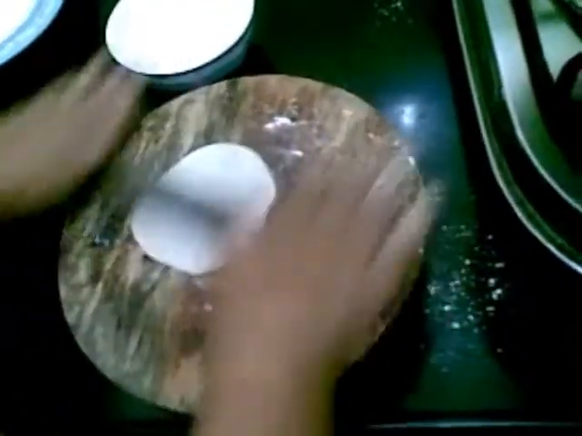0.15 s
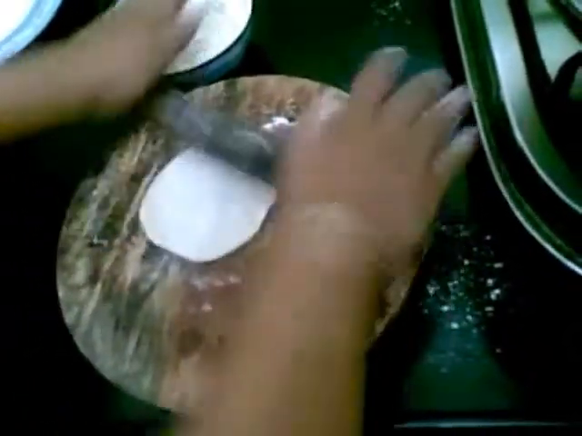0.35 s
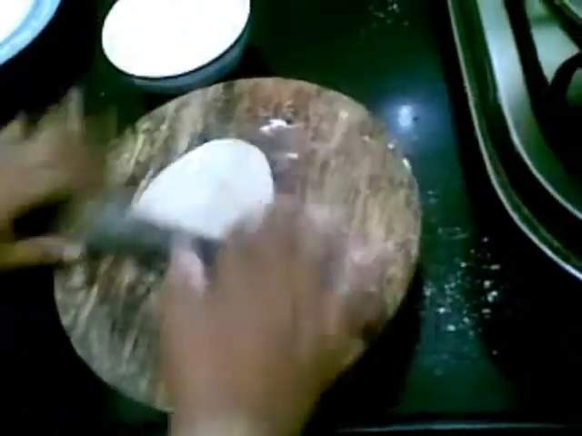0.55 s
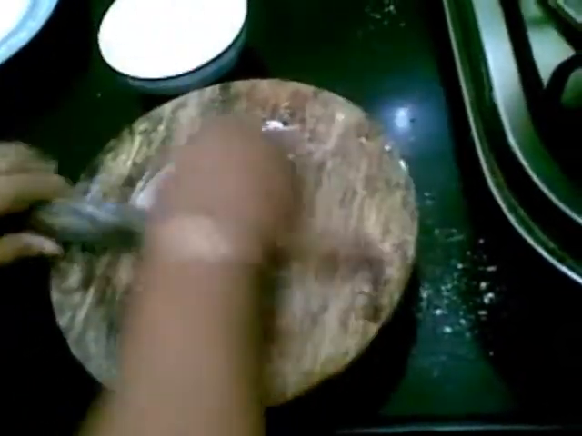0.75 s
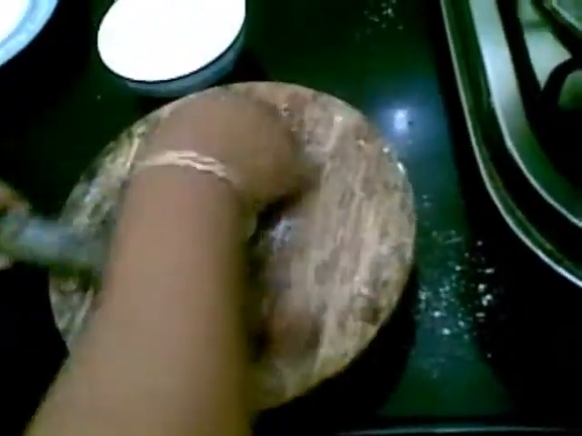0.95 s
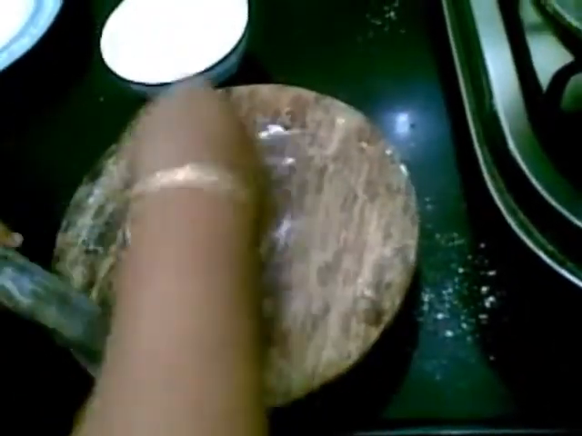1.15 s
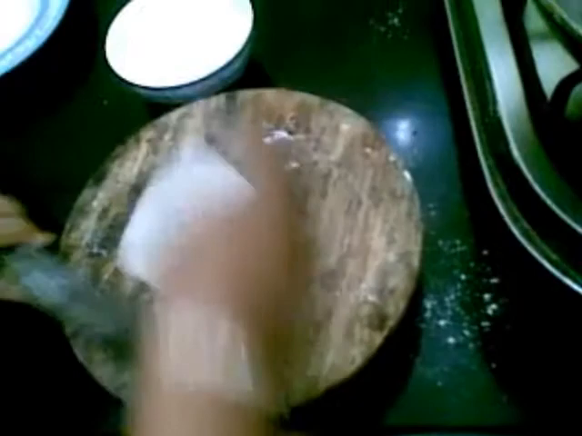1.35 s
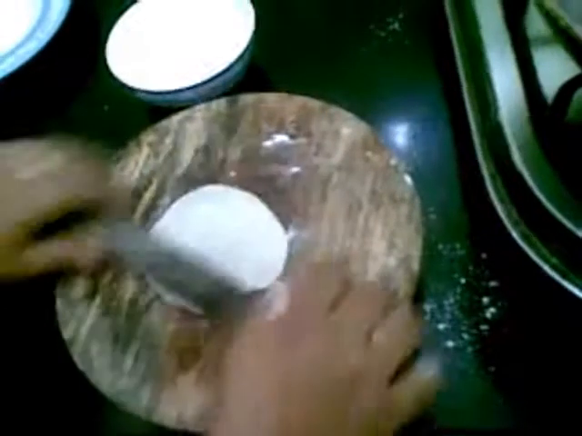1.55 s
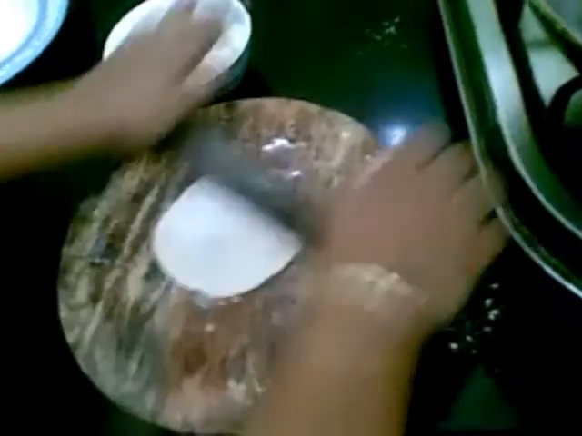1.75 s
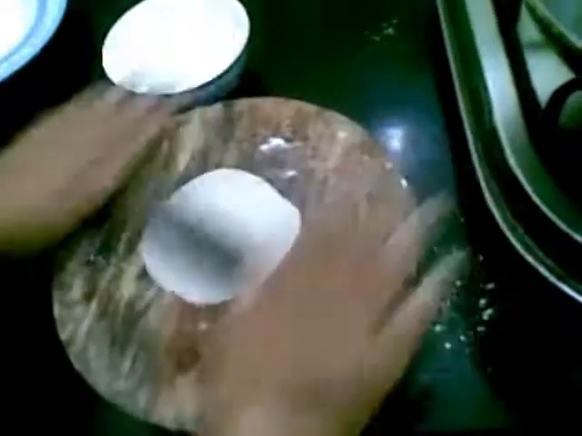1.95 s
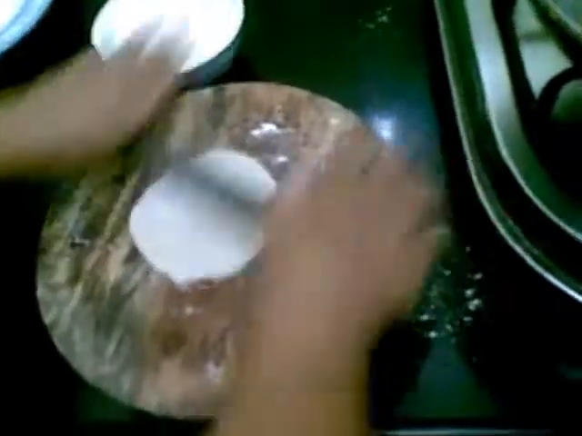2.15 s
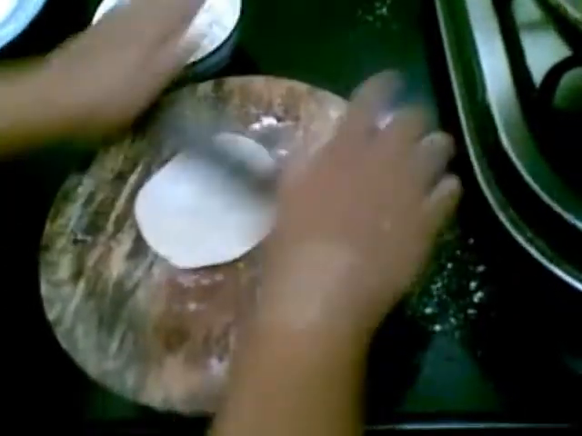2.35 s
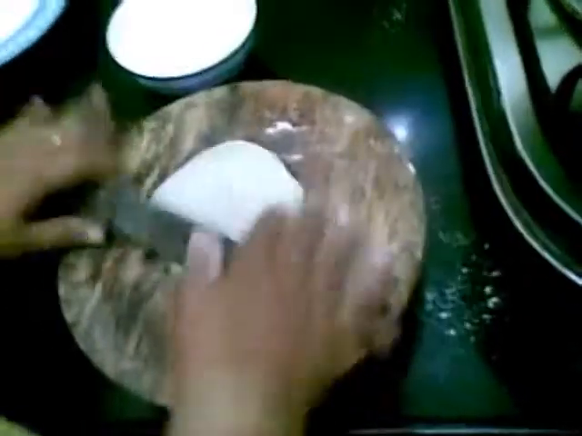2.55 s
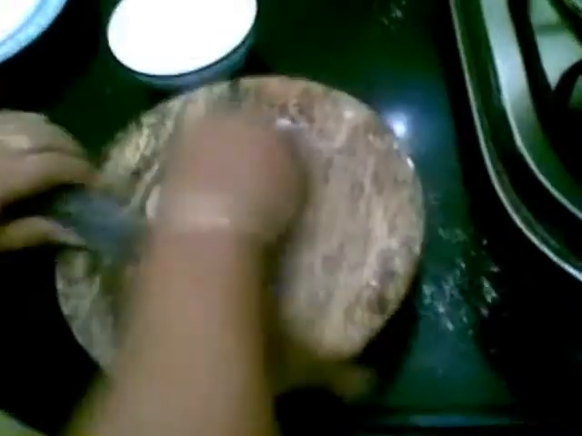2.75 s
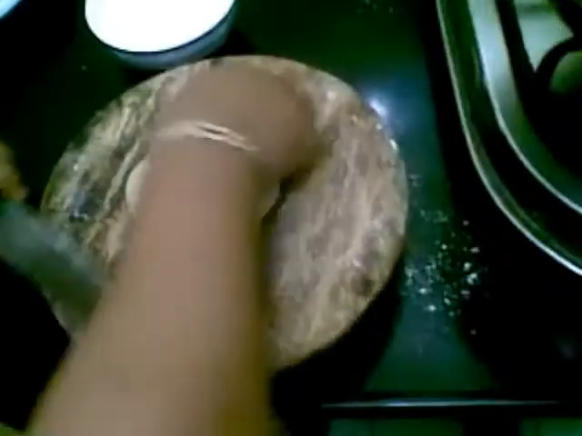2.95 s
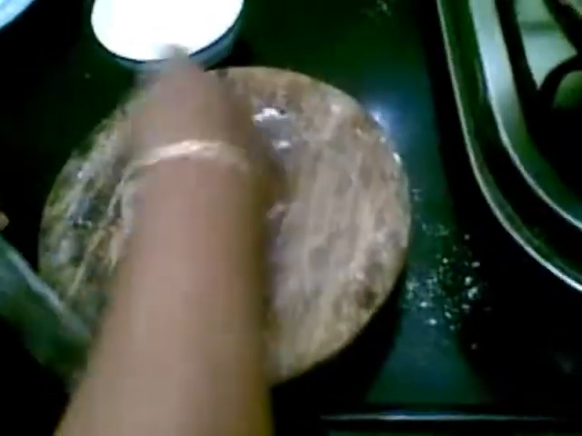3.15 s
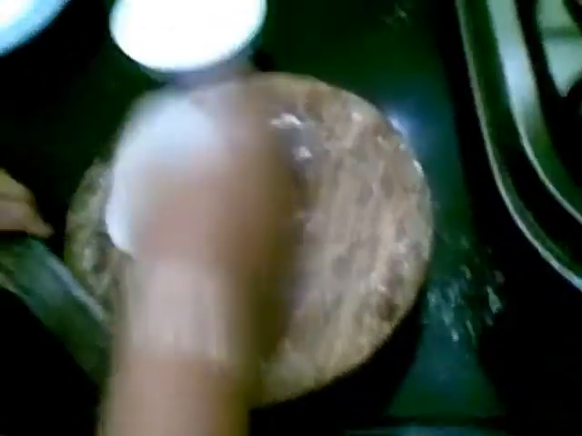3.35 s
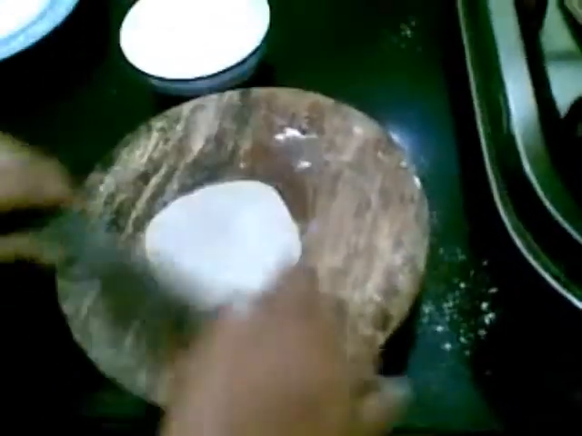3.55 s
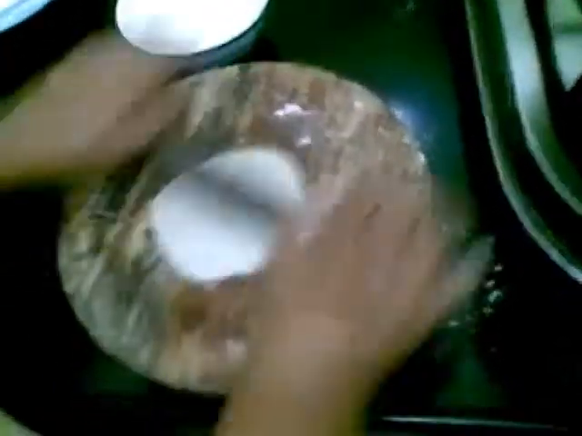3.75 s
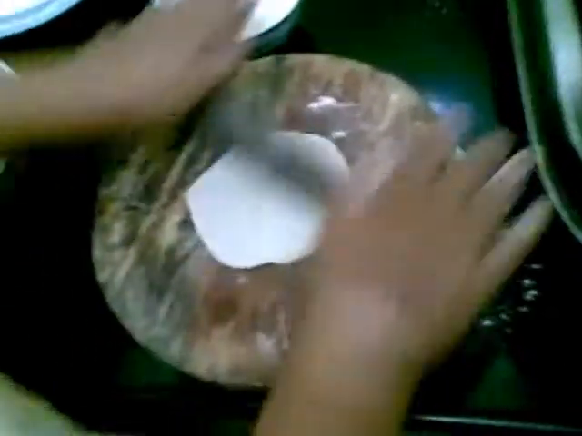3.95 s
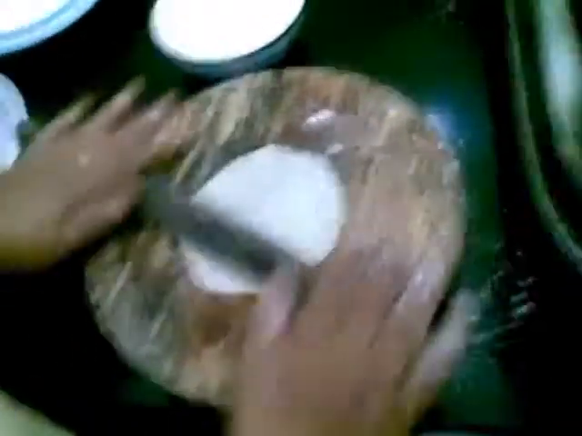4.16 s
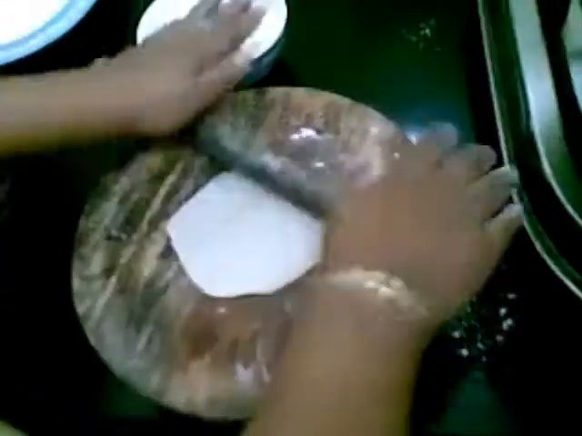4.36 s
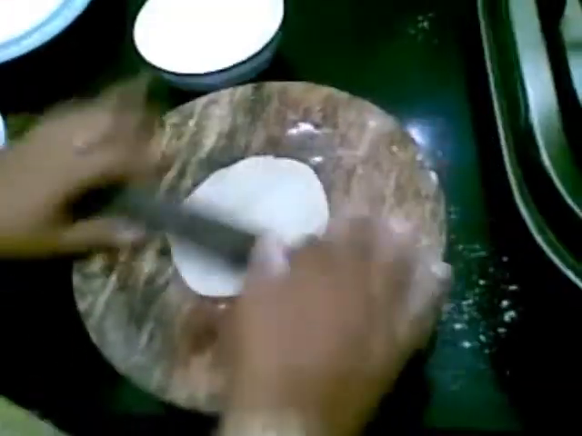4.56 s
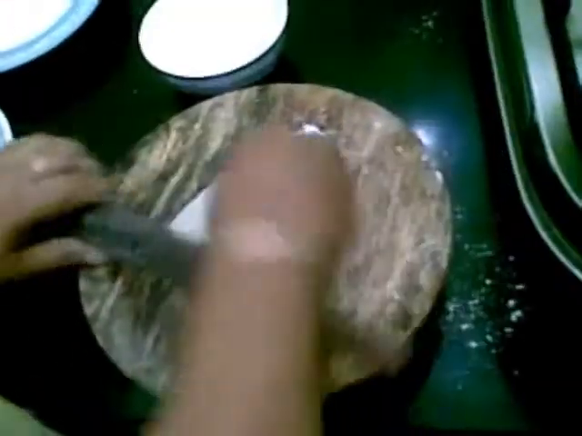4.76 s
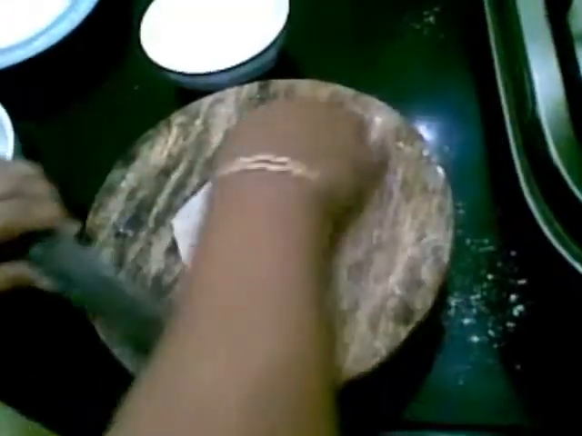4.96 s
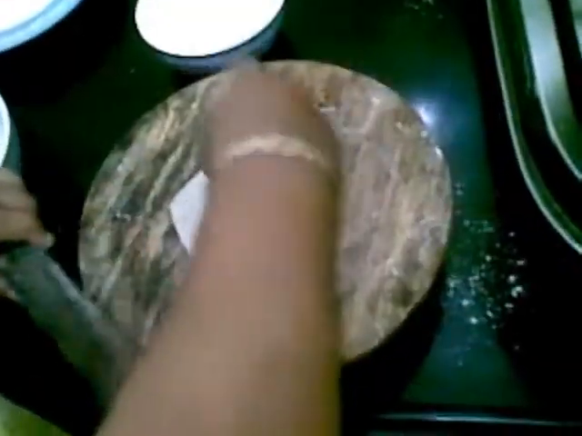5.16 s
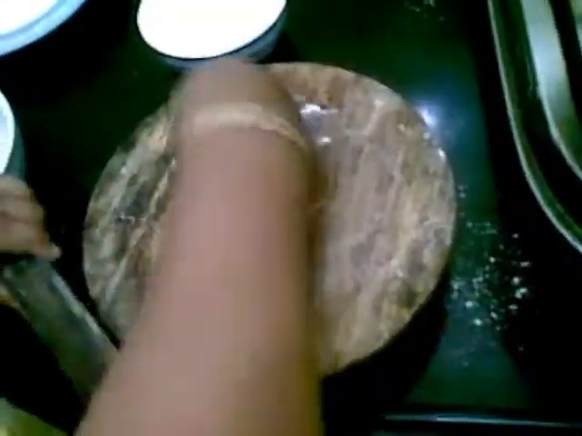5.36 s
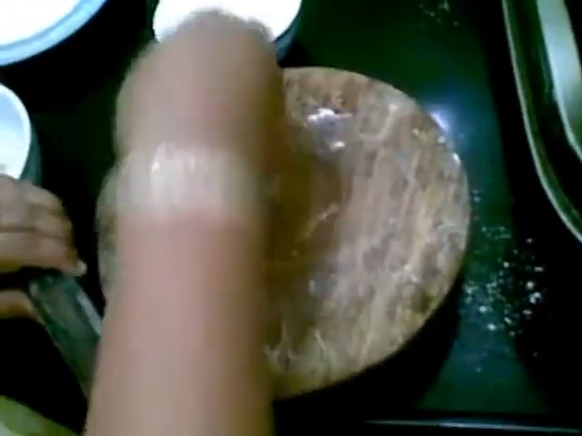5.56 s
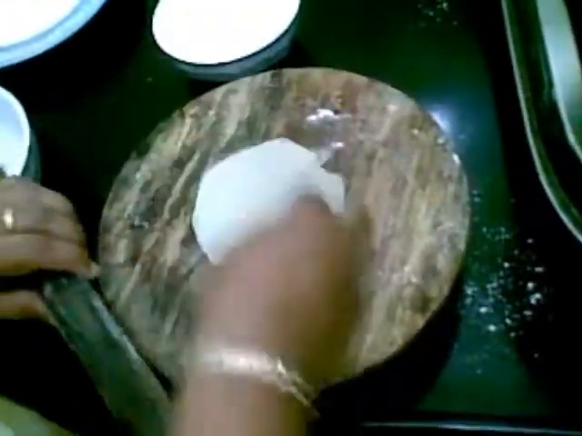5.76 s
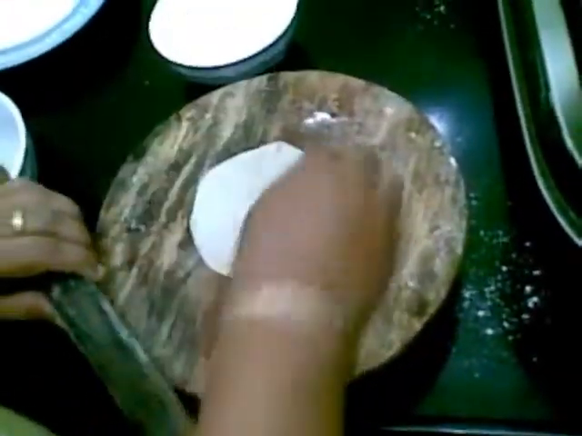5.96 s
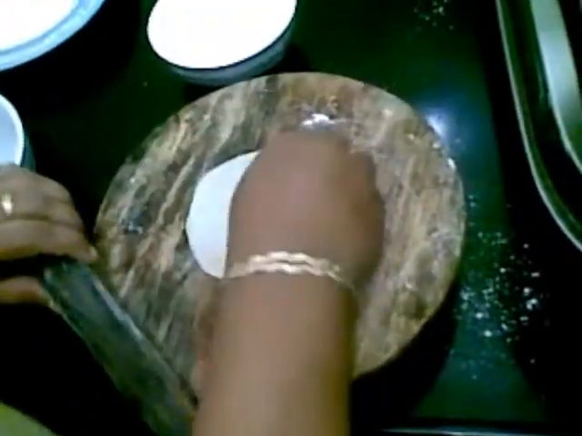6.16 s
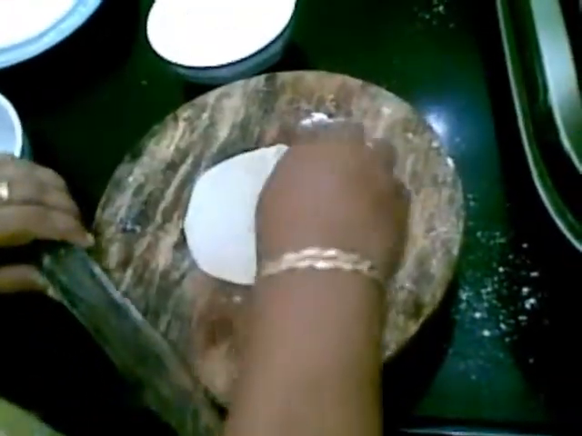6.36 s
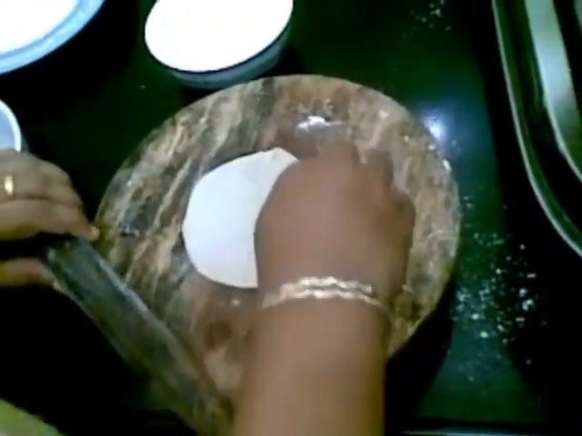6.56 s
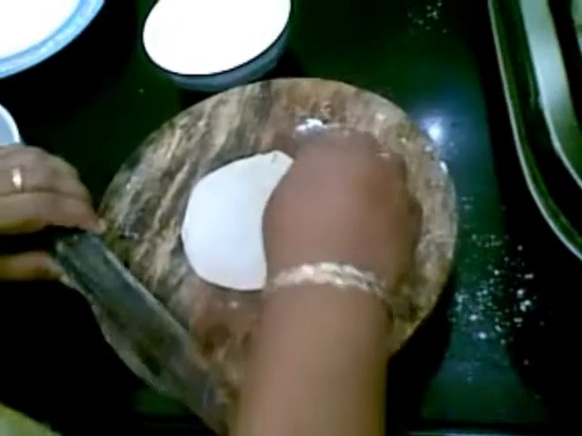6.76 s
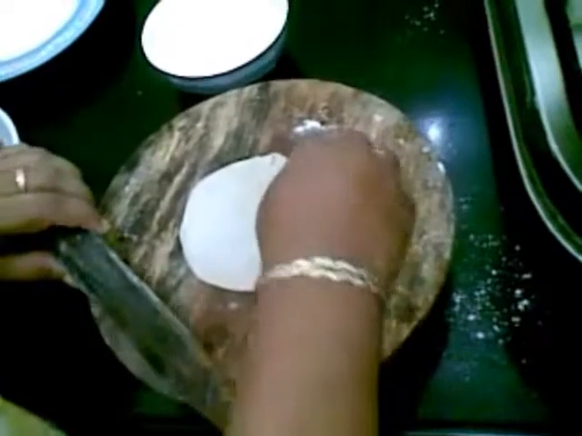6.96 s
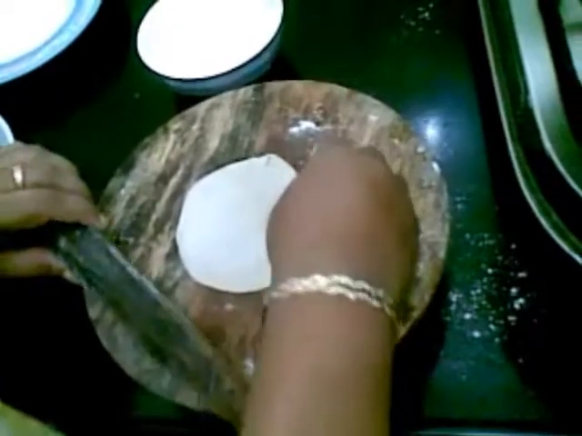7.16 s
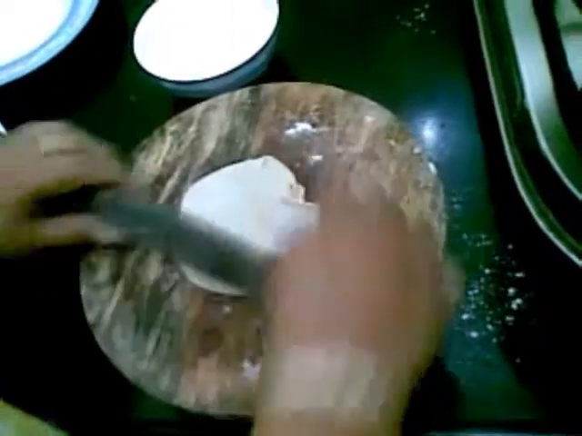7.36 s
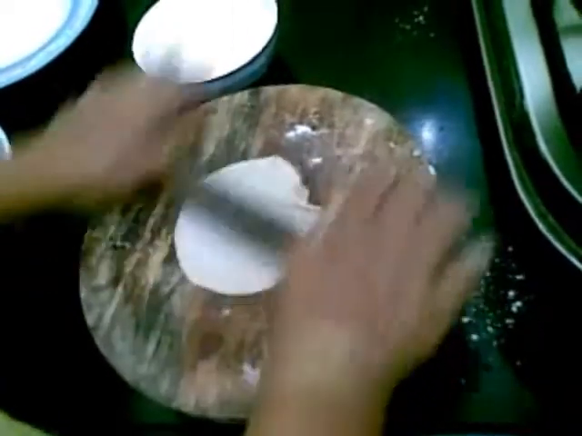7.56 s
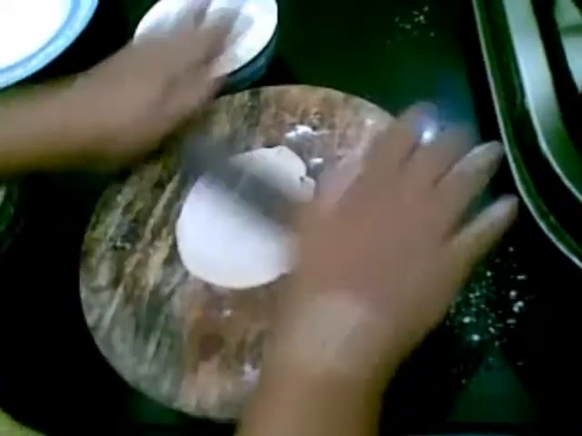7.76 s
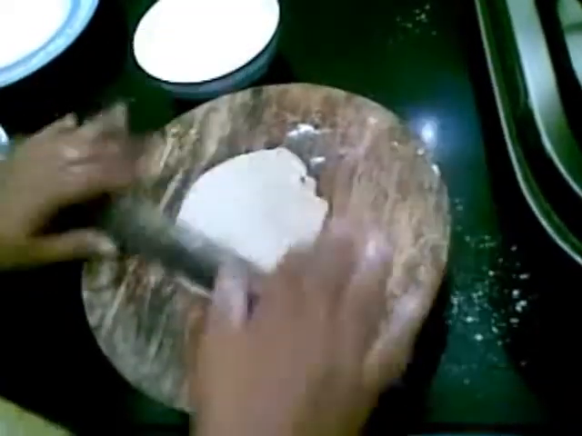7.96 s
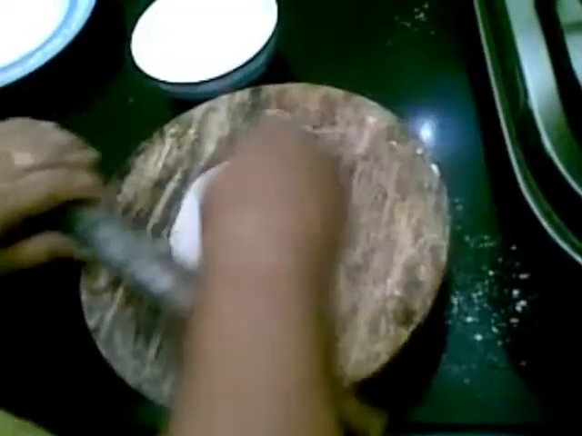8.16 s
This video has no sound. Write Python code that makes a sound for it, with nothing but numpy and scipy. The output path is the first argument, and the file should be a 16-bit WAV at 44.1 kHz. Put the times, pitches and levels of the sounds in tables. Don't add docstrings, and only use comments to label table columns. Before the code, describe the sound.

Steady gas hiss and house hum lie under sparse handling sounds: a ring ticking on a wooden pin, bangles chinking thinly, palms brushing flour, and the board rocking with hollow knocks on a heavy counter. Dough tears loose with dry snaps, the loudest late on. Short hard-walled echoes follow; the cheap close phone microphone dips the background after blows and coarsens the treble.

```python
import sys
import numpy as np
from scipy import signal
from scipy.fft import rfft, irfft
from scipy.io import wavfile
from scipy.ndimage import uniform_filter1d

SR = 44100
rng = np.random.default_rng(int(sys.argv[2]) if len(sys.argv) > 2 else 0)


def makeup_ratio(level_db):
    decades = np.asarray(level_db, float) / 20
    return 10 ** decades


def int16_out(signal):
    q = np.round(np.clip(np.atleast_2d(signal).T, -1, 1) * 32767)
    wavfile.write(sys.argv[1], SR, q.astype(np.int16))


N = 362061


def add(track, s, sound):
    i = max(int(s * SR), 0)
    track[i:i + len(sound)] += sound[:N - i]


def coloured(points):
    hz, db = np.transpose(points)
    log_hz = np.log(np.arange(N // 2 + 1) * SR / N + 1)
    shape = makeup_ratio(np.interp(log_hz, np.log(hz), db))
    x = irfft(rfft(rng.standard_normal(N)) * shape, N)
    return x / x.std()


def band(x, hz, share):
    edges = np.clip([hz / (1 + share), hz * (1 + share)], 5, 0.45 * SR)
    return signal.sosfilt(signal.butter(2, edges, "bandpass", fs=SR, output="sos"), x)


def walk(rate):
    hold = int(SR / rate)
    levels = np.repeat(rng.standard_normal(N // hold + 1), hold)
    return uniform_filter1d(levels, hold)[:N]


def swells(t, rows):
    bumps = [db * np.sin(np.pi * np.clip((t - s) / length, 0, 1)) for s, length, db in rows]
    return np.max(bumps, axis=0)


def ducking(t):
    # (time [s], depth [dB], hold [s])
    ducks = [
        (1.76, 4, 0.81),
        (3.774, 3, 0.86),
        (4.837, -1, 0.1),
    ]
    attack_s, release_s = 0.061, 0.93
    gain_db = np.zeros(len(t))
    for s, depth_db, hold_s in ducks:
        down = np.clip((t - s) / attack_s, 0, 1)
        back = np.clip((t - (s + attack_s + hold_s)) / release_s, 0, 1)
        gain_db -= depth_db * (down - back)
    return gain_db


def house_hum(t):
    # (frequency [Hz], level [dB per Hz])
    hum = [(29, -45.5), (50, 3.5), (71, -5.5), (145, 2), (176, -2.5), (199, 0.5), (289, 1.5), (384, -5),
           (542, -2), (710, -7), (959, -7), (1030, -7.5), (1800, -12.5), (2340, -32), (3960, -120)]
    # (time [s], length [s], lift [dB])
    rolls = [
        (-0.2, 0.63, 2.5),
        (0.45, 0.72, 2.5),
        (2.55, 0.26, 4),
        (3.05, 0.47, 3),
        (4.45, 0.4, 2),
        (5.9, 0.96, 1.5),
        (7.8, 1, -13),
    ]
    return coloured(hum) * makeup_ratio(-43.5 + swells(t, rolls) + 1.3 * walk(14))


def burner_hiss(t):
    # (frequency [Hz], level [dB per Hz])
    hiss = [(880, -32.5), (1500, -18.5), (1990, -5), (2830, 1.9), (3410, -4.5), (4100, -13), (4960, -17),
            (5500, -22.5), (6500, -31.5), (9000, -43)]
    # (time [s], hiss level [dB], pin rub above it [dB])
    flame = [
        (0, -45, -4.5),
        (2.0, -43.5, -8),
        (3.7, -45, -3.5),
        (4.3, -41, -10.5),
        (5.3, -44, -11.5),
        (6.4, -41, -23),
        (7.0, -43, -17),
        (8.21, -43, -18.5),
    ]
    s, *columns = np.transpose(flame)
    hiss_db, sharp_db = (np.interp(t, s, c) for c in columns)
    body = coloured(hiss) * makeup_ratio(hiss_db - 1.0 + 0.68 * walk(20))
    sharp = band(band(rng.standard_normal(N), 3950, 0.18), 3950, 0.48)
    return body + sharp / sharp.std() * makeup_ratio(hiss_db + sharp_db)


def rumble(t):
    # (time [s], length [s], lift [dB])
    shifts = [
        (0.75, 0.86, 10.5),
        (2.756, 0.53, 6),
        (5.55, 0.72, 1.5),
        (6.25, 0.59, 8.5),
        (6.65, 0.6, 8),
        (7.0, 0.93, 13.5),
        (7.706, 0.9, 8),
    ]
    deep = band(rng.standard_normal(N), 19, 0.7)
    return deep / deep.std() * makeup_ratio(-53.5 + swells(t, shifts))


def whine(t):
    # (multiple of the base pitch [1], level [dB])
    tones = [(1, -52.5), (21, -73), (23, -73), (24, -69.5), (25, -81.5), (26, -83), (27, -69.5),
             (28, -63.5), (29, -69.5), (30, -69), (31, -72)]
    base_hz = 293.0
    return sum(makeup_ratio(db - 4.0) * np.sin(2 * np.pi * k * base_hz * t + k * k) for k, db in tones)


def kitchen():
    # (frequency [Hz], level [dB per Hz])
    air = [(3500, -31), (5000, -4), (6500, 1), (8000, -1.5), (9000, 0), (9600, -2.5), (10500, -31)]
    t = np.arange(N) / SR
    gain_db = ducking(t)
    steady = (house_hum(t) + burner_hiss(t)) * makeup_ratio(gain_db)
    return steady + rumble(t) + coloured(air) * makeup_ratio(-59.5 + 0.67 * gain_db) + whine(t)


def walls(send):
    # (centre [Hz], time to fall 60 dB [s], level [dB])
    room = [(203, 0.5, 6.5), (407, 0.44, 7.5), (870, 0.54, -3), (1730, 0.55, -2), (3200, 0.38, 5.5),
            (6600, 0.67, -2)]
    first_echo_s, build_s = 0.0053, 0.0021
    t = np.arange(int(0.7 * SR)) / SR
    build = 1 - np.exp(-np.clip(t - first_echo_s, 0, 1) / build_s)
    tail = sum(band(rng.standard_normal(len(t)), hz, 0.45) * makeup_ratio(db - 60 * t / t60) for hz, t60, db in room)
    return signal.fftconvolve(send, 0.14 * build * tail)[:N]


def palm_brushes():
    # (time [s], length [s], level [dB], centre [Hz])
    strokes = [
        (1.306, 0.13, -47, 6100),
        (3.19, 0.99, -56.5, 5560),
        (5.124, 0.13, -47, 5430),
        (6.332, 0.11, -42.5, 4120),
        (0.849, 0.067, -33.5, 3200),
        (3.598, 0.042, -39, 5070),
        (6.043, 0.12, -43, 2630),
    ]
    out = np.zeros(N)
    n = SR // 2
    for s, length, db, hz in strokes:
        grains = rng.standard_normal(n) * makeup_ratio(7.9 * rng.standard_normal(n))
        swell = np.sin(np.pi * np.clip(np.arange(n) / SR / length, 0, 1) ** 0.55)
        add(out, s, makeup_ratio(db + 2.5) * swell * band(band(grains, hz, 0.4), hz, 0.4))
    return out


def ring(modes, lift_db, rise_s, scatter_db, detune, damp):
    hz, db, t60 = (c[:, None] for c in np.transpose(modes))
    chance = rng.standard_normal((3, len(modes), 1))
    t = np.arange(SR // 6) / SR
    decay_db = 60 * t / np.clip(damp * t60, 0.001, 1)
    size = makeup_ratio(db + lift_db[:, None] + scatter_db * chance[0] - decay_db)
    wave = np.sin(2 * np.pi * hz * (1 + detune * chance[1]) * t + chance[2] / 2)
    return (size * wave).sum(0) * (1 - np.exp(-t / rise_s))


def blows(events, modes, edges_hz, rise_s, scatter_db, detune, trim_db, crack):
    dry, send = np.zeros(N), np.zeros(N)
    group = np.searchsorted(edges_hz, np.array(modes)[:, 0])
    for s, lifts_db, room_db, damp in events:
        lift_db = np.array(lifts_db)[group] + trim_db
        add(dry, s, ring(modes, lift_db, rise_s, scatter_db, detune, damp))
        add(send, s, ring(modes, lift_db + room_db, rise_s, scatter_db, detune, crack))
    return np.array([dry, send])


def two_groups(events, room_db):
    return [(s, (db, db + upper_db), room_db, 1) for s, db, upper_db in events]


def bangle_chinks():
    # (time [s], level [dB], upper modes above it [dB])
    chinks = [(0.018, -49, -10), (0.4464, -35.5, -13), (0.6, -43.5, -16), (0.857, -34.5, -9),
              (1.909, -42, -12.5), (2.3282, -39, -8), (2.8505, -34, -8), (3.949, -39, -9),
              (4.4114, -37.5, -2), (4.8345, -60, -13), (4.8619, -36, -7.5), (6.1792, -44.5, -11),
              (6.4657, -43.5, -16), (7.7493, -42.5, -9)]
    # (frequency [Hz], level [dB], time to fall 60 dB [s])
    bangles = [(5400, -5, 0.039), (5780, -8.5, 0.053), (6360, -15.5, 0.074), (7415, -0.5, 0.092),
               (7530, -10.5, 0.18), (7830, -0.5, 0.043), (8980, 1, 0.16), (9530, 2.5, 0.16),
               (9660, -5, 0.08)]
    again = [(s + 0.011, db - 8, upper_db) for s, db, upper_db in chinks]
    return blows(two_groups(list(chinks) + again, room_db=-14.5), bangles, (8500,), rise_s=0.0008,
                 scatter_db=3.2, detune=0.0011, trim_db=-2.5, crack=0.44)


def dough_snaps():
    # (time [s], middle modes [dB], low above [dB], high above [dB], room share [dB])
    snaps = [
        (1.5384, -27, -3.5, -10, -18),
        (1.548, -21, 5, 1, -7.5),
        (3.5899, -11, -3, -6.5, -9.5),
    ]
    # (time [s], middle [dB], low above [dB], high above [dB], room [dB])
    cracks = [
        (3.6075, -9.5, -13, 5, -18),
        (5.8722, -11, -12, -9, -20),
        (5.8738, 2, -22, -12, -22.5),
    ]
    # (frequency [Hz], level [dB], time to fall 60 dB [s])
    dough = [(1430, -3, 0.018), (1854, -24, 0.013), (1996, 10, .014), (2353, 1.5, 0.025), (2696, 0, 0.019),
             (3110, -1.5, 0.025), (4020, -4, 0.012), (4190, -11, 0.029), (5260, -19, 0.0027),
             (5640, -10.5, 0.012), (6890, -6, 0.0076)]
    events = []
    for rows, ring_share in ((snaps, 0.66), (cracks, 0.29)):
        for s, db, low, high, room_db in rows:
            events.append((s, (db + low, db, db + high), room_db, ring_share))
    return blows(events, dough, (2200, 3300), rise_s=0.00058,
                 scatter_db=1.8, detune=0.031, trim_db=-0.5, crack=0.099)


def ring_ticks():
    # (time [s], level [dB], upper modes above it [dB])
    ticks = [
        (0.153, -15.5, 2.5),
        (2.1195, -15.5, -2.5),
        (2.609, -14, -2.5),
        (2.6139, -17, -12),
        (4.1793, -23.5, -24),
        (4.288, -28.5, -15),
        (8.1203, -35, -16),
    ]
    # (frequency [Hz], level [dB], time to fall 60 dB [s])
    pin = [(1460, -12.5, 0.036), (2758, 5, 0.023), (2960, 1.5, 0.024), (3195, -6, 0.0093),
           (3330, -1, 0.017), (3740, -4.5, 0.025), (3996, -4, 0.023), (5420, -13.5, 0.019),
           (6320, -3.5, 0.0043), (7600, -17.5, 0.017), (9860, -22, 0.015)]
    return blows(two_groups(ticks, room_db=-25.5), pin, (3000,), rise_s=0.00089,
                 scatter_db=0.22, detune=0.012, trim_db=0.5, crack=0.74)


def counter_thuds():
    # (time [s], lower modes [dB], upper modes above [dB])
    thuds = [(0.019, -33.5, -4.5), (0.178, -33, -5.5), (0.494, -38, -1.5), (0.625, -32.5, -4.5),
             (0.854, -29.5, 2.5), (1.7, -17, 1), (2.625, -36, 2), (2.843, -28, -8), (3.773, -25.5, -5),
             (4.668, -36, -2.5), (4.732, -27, -1.5), (4.822, -22.5, -6.5), (7.562, -17, -12),
             (8.028, -30.5, -5)]
    # (frequency [Hz], level [dB], time to fall 60 dB [s])
    counter = [(122, -15, 0.22), (195, -15.5, 0.096), (239.8, -5, 0.2), (267, 2, 0.08), (340.7, -1, 0.18),
               (454, -17.5, 0.055), (458.4, 7, 0.15), (576, -2.5, 0.18)]
    return blows(two_groups(thuds, room_db=-10.5), counter, (400,), rise_s=0.0038,
                 scatter_db=2.0, detune=0.0059, trim_db=-3.5, crack=0.27)


def board_knocks():
    # (time [s], middle modes [dB], low above [dB], high above [dB], top above [dB])
    knocks = [(0.1795, -39, -1.5, 0, 9.5), (0.5778, -38, -10, 5, 3), (0.626, -32.5, -5.5, -3.5, -13),
              (0.8537, -34, -11, 2.5, -11), (0.876, -28, -21, -0.5, 0), (1.7014, -5, -9, -20, 0),
              (1.7082, -11, -4.5, 2, 1), (2.1866, -43, -13, -12, -15), (2.6285, -32, -6.5, -8, 2),
              (2.8444, -19, -17.5, -9, -11.5), (3.7748, -5, -15, -5, -6.5), (4.7328, -19, -17, -5.5, -23),
              (4.822, -19.5, -13.5, -0.5, -10), (4.8316, -21.5, -28, -5, -19), (7.562, -26, -4, 2.5, -9),
              (8.028, -22, -10, -1.5, -15)]
    # (frequency [Hz], level [dB], time to fall 60 dB [s])
    board = [(683, 4.5, 0.054), (741, 8, 0.038), (730, -5.5, 0.068), (992, -7.5, 0.088), (1239, -1, 0.02),
             (1303, -4.5, 0.034), (1455, 1.5, 0.036), (1708, -4, 0.036), (1898, 5.5, 0.018),
             (2177, 3, 0.027), (2603, 5, 0.02), (3284, 1.5, 0.029), (3670, -1, 0.017), (3830, -0.5, 0.019),
             (4495, -5.5, 0.016), (5302, -10, 0.017), (5630, -19.5, .012), (6700, -22, .008),
             (8140, -34, 0.015)]
    borders_hz = (1000, 1700, 2800)
    room_db = -9
    events = [(s, (db + low, db, db + high, db + top), room_db, 1) for s, db, low, high, top in knocks]
    return blows(events, board, borders_hz, rise_s=0.0005,
                 scatter_db=2.8, detune=0.028, trim_db=-3.0, crack=0.27)


def scene():
    dry, send = bangle_chinks() + dough_snaps() + ring_ticks() + counter_thuds() + board_knocks()
    echoes = walls(send) * makeup_ratio(ducking(np.arange(N) / SR))
    return (dry + echoes + palm_brushes() + kitchen())[None]


def starved(x, size, follow, lift_db):
    # (frequency [Hz], step [dB])
    coarseness = [(3000, -54), (4200, -45), (4900, -41), (5500, -39), (10000, -39)]
    n, k = np.arange(2 * size), np.arange(size // 8, size // 2)[:, None]
    window = np.sin(np.pi * (n + 0.5) / (2 * size))
    waves = np.cos(np.pi / size * (n + 0.5 + size / 2) * (k + 0.5))
    basis = np.sqrt(2 / size) * window * waves
    count = N // size + 2
    halves = np.pad(x, (size, count * size - N)).reshape(-1, size)
    blocks = np.hstack([halves[:-1], halves[1:]])
    lines = blocks @ basis.T
    loud_db = 10 * np.log10(np.sum(lines ** 2, axis=1) / size + 1e-9)[:, None]
    step_db = np.interp(k.T * SR / 2 / size, *np.transpose(coarseness))
    step = makeup_ratio(step_db + follow * (loud_db + 47) + lift_db)
    error = (np.round(lines / step) * step - lines) @ basis
    return x + (error[:-1, size:] + error[1:, :size]).ravel()[:N]


def band_limit(x):
    return signal.sosfilt(signal.butter(12, 10810, fs=SR, output="sos"), x)


def record(dry):
    rounded = np.tanh(1.118 * dry[0]) / 1.047
    x = signal.sosfilt(signal.ellip(8, 0.2, 70, 9900, fs=SR, output="sos"), rounded)
    quick = uniform_filter1d(band(x, 2500, 1.5) ** 2, size=128)
    before = np.roll(uniform_filter1d(quick, size=1024), 640)
    attack = uniform_filter1d(1.0 * (quick > 13 * before), size=1500) > 0
    short = uniform_filter1d(1.0 * attack, size=200)
    at_blows = starved(x, size=256, follow=0.75, lift_db=-3)
    elsewhere = starved(x, size=1152, follow=0.58, lift_db=0)
    mix = short * at_blows + (1 - short) * elsewhere
    return band_limit(mix[None])


dry = scene()
out = record(dry)
int16_out(out)
```